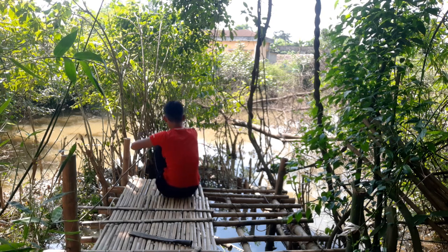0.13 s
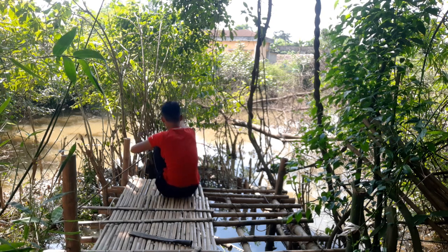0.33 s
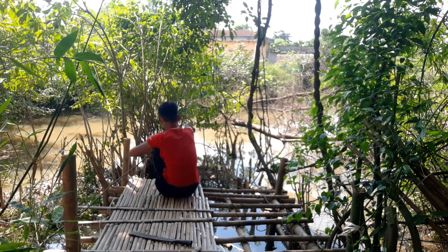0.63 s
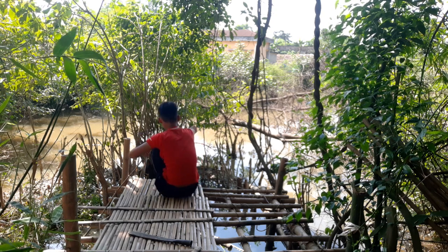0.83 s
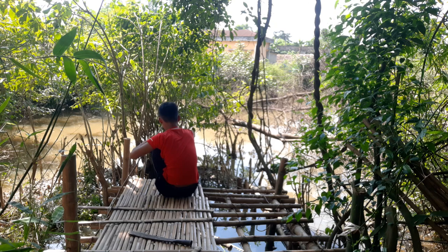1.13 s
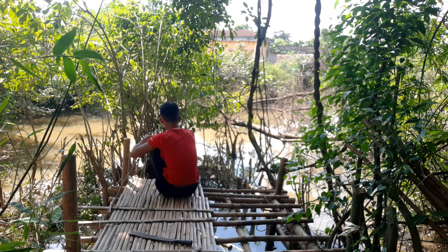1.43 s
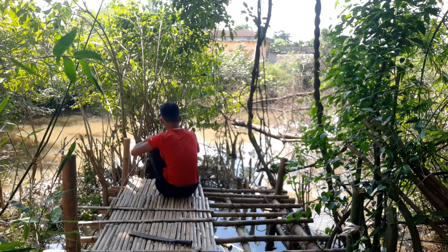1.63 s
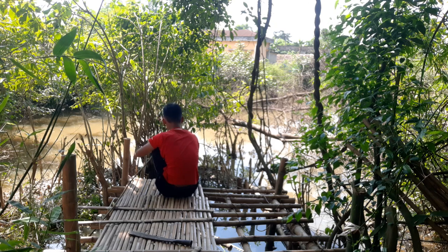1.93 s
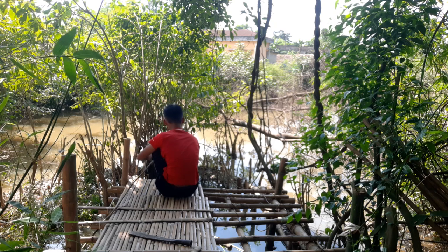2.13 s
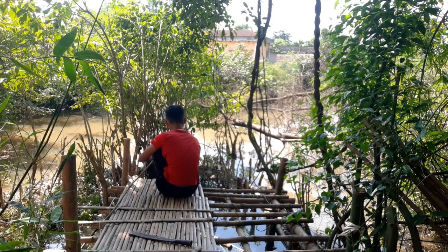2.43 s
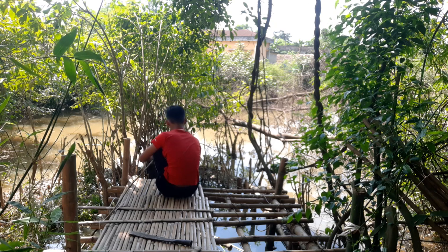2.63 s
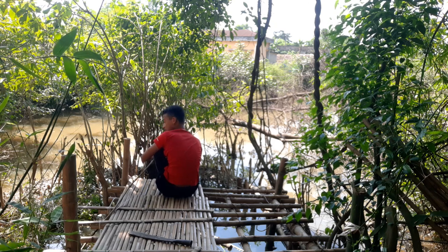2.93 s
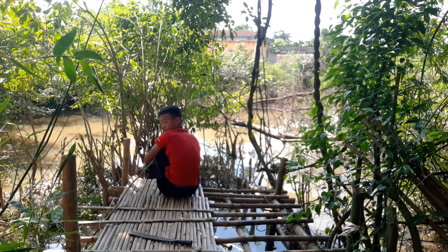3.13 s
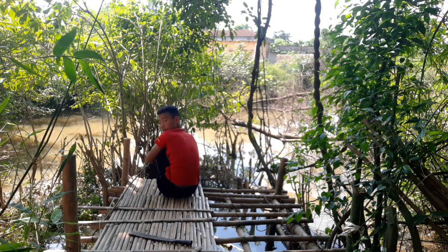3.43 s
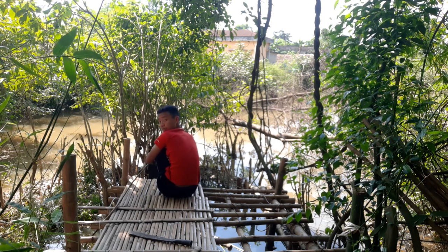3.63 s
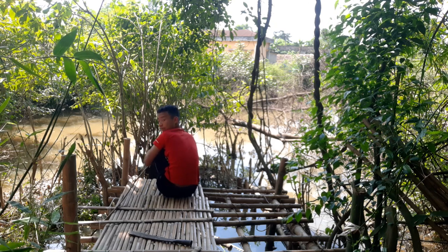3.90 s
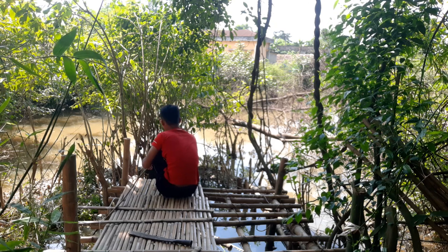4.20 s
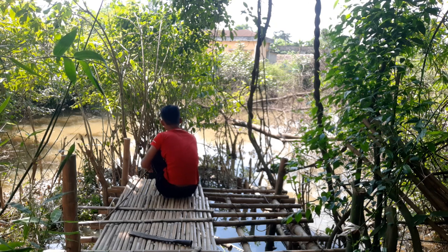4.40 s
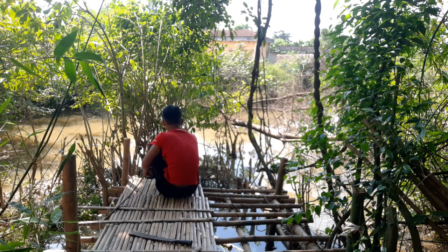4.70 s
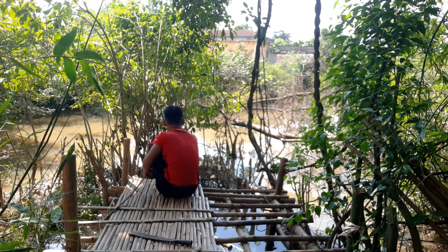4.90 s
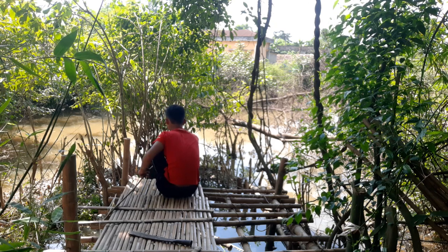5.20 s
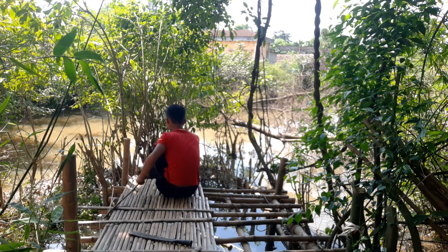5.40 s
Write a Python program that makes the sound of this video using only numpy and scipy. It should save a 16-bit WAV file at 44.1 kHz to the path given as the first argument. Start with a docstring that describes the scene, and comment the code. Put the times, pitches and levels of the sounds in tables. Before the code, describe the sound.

Cicadas dominate outdoors by a wooded pond: a narrow, shrill whine stronger on the right and a very high, throbbing sizzle on the left. Beneath lie dim engine rumble and a faint leafy wash. A few small bamboo ticks come early, then soft scrapes from around two seconds and again toward the end, as someone shifts on the deck. Wide stereo, with the deck fairly near.

```python
"""Cicadas first: a narrow whine, louder on the right, and a throbbing sizzle, louder on the left.
Whine: sums of click-rate partials through a body resonance. Sizzle: random clicks with echo ripples.
Under them two far engines (sine orders over noise rumble) and a wash of leaves and traffic (shaped noise).
Now and then a bamboo deck ticks and scrapes (noise bursts and grains into modes); faint far bird
notes (rough gliding sines) are heard as echo."""
import sys
import numpy as np
from scipy import signal
from scipy.fft import rfft, irfft
from scipy.io import wavfile
from scipy.ndimage import uniform_filter1d

SR = 44100
rng = np.random.default_rng(int(sys.argv[2]) if len(sys.argv) > 2 else 0)


def output_pcm(signal):
    """Save a mono or channel-first signal as 16-bit PCM at the path in sys.argv[1].

    Samples are clipped to [-1, 1] before scaling.
    """
    pcm = np.clip(np.atleast_2d(signal).T, -1, 1) * 32767
    wavfile.write(sys.argv[1], SR, np.round(pcm).astype(np.int16))


def decibels_to_gain(level_db):
    """Convert a level in decibels to a linear amplitude gain (20 dB per decade)."""
    exponent = np.asarray(level_db, float) / 20
    return 10 ** exponent


N = 244755
HZ = np.fft.rfftfreq(N, 1 / SR)
T = np.arange(N) / SR


def evened(x):
    """Scales each channel to rms 1."""
    return x / np.sqrt(np.mean(x ** 2, axis=-1, keepdims=True) + 1e-20)


def curves(rows):
    """Each column joined by straight lines in time."""
    s, *columns = np.transpose(rows)
    return [np.interp(T, s, c) for c in columns]


def read(points):
    """A spectrum joined by straight lines over log frequency."""
    f, value = np.transpose(points)
    return np.interp(np.log(HZ + 1), np.log(f + 1), value)


def coloured(x, gain):
    """Filters by a gain or a complex response at every frequency."""
    return irfft(rfft(x) * gain, N)


def sides(db):
    """Left and right gains for a left-minus-right difference."""
    return decibels_to_gain(np.array([db / 2, -db / 2]))


def wander(shape, per_s):
    """Smooth chance of about rms 1 that changes about per_s times a second."""
    step = 64  # samples
    slow = rng.standard_normal(shape + (N // step + 2,))
    count = slow.shape[-1]
    lowpass = np.exp(-(np.fft.rfftfreq(count, step / SR) / per_s) ** 2)
    slow = evened(irfft(rfft(slow) * lowpass, count))
    index = np.arange(N) // step
    part = np.arange(N) % step / step
    return slow[..., index] * (1 - part) + slow[..., index + 1] * part


def modes(table):
    """Causal response of a set of resonances."""
    return sum(decibels_to_gain(db) / (1 + 2j * (HZ - hz) / width_hz) for hz, width_hz, db in table)


def woods(x, t60):
    """Trunks and water scatter the sound into a diffuse tail, another one in each channel."""
    t = T[:round(t60 * SR)]
    tail = rng.standard_normal((2, len(t))) * decibels_to_gain(-60 * t / t60)
    return signal.fftconvolve(x, tail / np.linalg.norm(tail[0]), axes=1)[:, :N]


def faded(rows, level_db):
    """A gain that follows level_db within the table's span and is silent outside it."""
    start, end = rows[0][0], rows[-1][0]
    return decibels_to_gain(level_db) * np.interp(T, [start, start + 0.019, end - .03, end], [0, 1, 1, 0])


def arch(start, length, top, ends_db):
    """A gain that swells to 1 at the share top of its length, falls again, and is silent outside."""
    points_s = [start, start + top * length, start + length]
    return faded([(start,), (start + length,)], np.interp(T, points_s, [ends_db, 0, ends_db]))


# wash spectrum: f/Hz, relative level/dB per Hz
AIR_COLOUR = [(15, -52), (25, -72), (49, 0.5), (97, 0), (151, -29.5), (237, -13.5), (301, -36), (328, -14),
              (372, -17.5), (525, -23), (2460, -26.5), (2860, -26.5), (3320, -21.5), (3770, -41),
              (5200, -60), (8000, -44), (9000, -74)]
# left-right likeness: f/Hz, correlation
AIR_SAME = [(60, 1), (140, 0.58), (330, 0.2), (770, 0.56), (1800, 0), (8000, 0.75)]
# wash balance: f/Hz, left minus right/dB
AIR_SIDE = [(60, -8.5), (300, 2), (1200, 2), (2700, -4), (4200, -5), (5300, -10), (8500, -4)]
AIR_DB = -64.5


def air():
    """Far leaves and traffic: shaped noise whose left-right likeness varies with frequency."""
    left, other = rng.standard_normal((2, N)) * decibels_to_gain(0.5 * wander((1,), per_s=16))
    same = np.clip(read(AIR_SAME), -1, 1)
    right = coloured(left, same) + coloured(other, np.sqrt(1 - same ** 2))
    pair = coloured(np.array([left, right]), decibels_to_gain(read(AIR_COLOUR)) * sides(read(AIR_SIDE)))
    return decibels_to_gain(AIR_DB) * pair / pair.std()


# exhaust spectrum: f/Hz, relative level/dB
EXHAUST = [(21, -61), (35, -44), (54, -10.5), (96, -4), (141, -2.5), (174, -6.5), (222, -19.5), (313, -22),
           (500, -30.5), (650, -32.5), (1100, -120)]
# rumble of road and exhaust: t/s, level/dB
RUMBLE = [(0, -57.5), (.7, -62.5), (1.6, -69), (2.8, -59.5), (3.4, -63.5), (3.95, -55), (4.6, -59.5),
          (5.25, -61.5), (5.55, -52.5)]
# two far engines, one list each: t/s, firing rate/Hz, level before exhaust colour/dB
ENGINES = [
    [(0, 31.4, -64), (.7, 27.4, -75), (1.3, 31.6, -59), (2.2, 27.1, -66), (2.8, 24.5, -82),
     (3.3, 27.7, -71), (4.0, 25.9, -64), (4.6, 25.2, -59), (5.55, 30, -61)],
    [(2.2, 21, -75), (3.3, 20.4, -60), (3.9, 25, -66), (4.15, 22, -72), (4.4, 12.8, -85)],
]


def engine():
    """Firing orders of two engines over a noise rumble, dulled by distance."""
    colour = read(EXHAUST)
    out = decibels_to_gain(curves(RUMBLE)[0]) * evened(coloured(rng.standard_normal(N), decibels_to_gain(colour)))
    for rows in ENGINES:
        firing_hz, db = curves(rows)
        turns = np.cumsum(firing_hz) / SR
        fading_db = 2.45 * wander((10,), per_s=1.0)  # the air path swells each order on its own
        orders = 0
        for k in range(2, 12):
            gain = decibels_to_gain(np.interp(k * firing_hz, HZ, colour) + fading_db[k - 2])
            orders = orders + gain * np.sin(2 * np.pi * k * turns)
        out += faded(rows, db) * orders
    return out * sides(2.85)[:, None]


# far bird notes: start t/s, length/s, first f/Hz, last f/Hz, level before echo/dB
NOTES = [(1.6, .22, 2900, 2900, -77), (3.92, .12, 2500, 2200, -71), (4.33, .2, 3200, 2620, -67)]
SETTLE_S, NOTE_RISE_SHARE, NOTE_ENDS_DB = .06, .3, -10


def bird():
    """Faint rough whistles, level or sliding down to settle, heard only as echo."""
    out = np.zeros(N)
    for start, length, first_hz, last_hz, db in NOTES:
        hz = last_hz + (first_hz - last_hz) * np.exp(-np.maximum(T - start, 0) / SETTLE_S)
        rough = 1 + .042 * wander((), per_s=100)
        tone = np.sin(2 * np.pi * np.cumsum(hz * rough) / SR)
        out += decibels_to_gain(db) * arch(start, length, NOTE_RISE_SHARE, NOTE_ENDS_DB) * tone
    return woods(out * sides(-4)[:, None], t60=.12)


def lean():
    """Left and right colour of the deck, from points of f/Hz, left minus right/dB."""
    return sides(read([(500, 2.0), (1300, 0.5), (2500, -3), (4000, -14), (7000, 1), (9500, -10), (15000, 2)]))


DECK_LAG_SAMPLES = 6


def deck_pair(x):
    """The deck reaches the right microphone late."""
    return coloured(np.array([x, np.roll(x, DECK_LAG_SAMPLES)]), lean())


# bamboo modes, rung by scrape and ticks: f/Hz, width/Hz, relative level/dB
BAMBOO = [(380, 70, -5), (520, 35, 1), (680, 120, -7), (900, 60, -2), (1060, 80, -5), (1220, 50, 0),
          (1330, 60, 0), (1460, 40, 0), (1650, 150, -6), (2150, 250, -4), (2750, 300, -3), (3150, 300, 0),
          (3450, 300, -3), (4100, 500, -4), (6400, 1800, -6)]
# slides on the deck: start t/s, length/s, relative level at top/dB, high modes against low/dB
SLIDES = [(1.085, .22, -74.5, -2), (2.178, 0.47, -63, -15), (2.59, .47, -61, -5.5),
          (3.743, 0.15, -69.5, -5), (3.787, .5, -72.5, 7), (4.202, 0.58, -75, 6), (4.647, 0.83, -73, 3),
          (5.244, 0.41, -69, 9)]
# share of the length at which each group is loudest: low, middle, high modes
SLIDE_TOPS = (0.44, .58, 0.53)
SLIDE_SPLIT_HZ, SLIDE_MIDDLE_DB, SLIDE_ENDS_DB = (830, 1470), -1, -18


def scrape():
    """Uneven stick-slip grains ring low, middle and high modes, each group catching on its own."""
    grip = decibels_to_gain(2.34 * wander((3, 1), per_s=13.5))  # the slide catches and lets go
    grains = (rng.random((3, 2, N)) < 900 / SR) * rng.standard_normal((3, 2, N)) * grip
    low, below = (1 / (1 + (HZ / hz) ** 6) for hz in SLIDE_SPLIT_HZ)
    bands = (low, below - low, 1 - below)
    groups = [evened(coloured(g, modes(BAMBOO) * band)) for g, band in zip(grains, bands)]
    rung = np.zeros((2, N))
    for start, length, db, bright_db in SLIDES:
        for group, top, group_db in zip(groups, SLIDE_TOPS, (0, SLIDE_MIDDLE_DB, bright_db)):
            rung += decibels_to_gain(db + group_db) * arch(start, length, top, SLIDE_ENDS_DB) * group
    shared = 0.23 * deck_pair(rung[0])
    separate = 1.454 * rung[::-1] * sides(3.4)[:, None]
    return shared + separate


# bamboo ticks: t/s, relative level/dB, then bass, middle, treble against it/dB
TICKS = [(0.2089, -23.5, -11, -7, -26), (0.2745, -22.5, -8, -5, -30), (0.4324, -18.5, -10, -11.5, -10),
         (0.9844, -27, -3.5, -3.5, -30), (1.071, -26, -5.5, -3, -30), (1.155, -39.5, -7, 0, -16),
         (2.1396, -32, -1, -5.5, -24), (3.766, -40.5, -2, -10, -10), (3.8049, -45.5, -7, -5, -10),
         (3.878, -31, -13, -7, -2), (3.9104, -38.5, -9, -18, 1)]
SNAP_S, FIZZ_S, RATTLE_RISE_S, RATTLE_T60_S, FIZZ_HZ = 0.0012, .002, 0.0015, 0.16, 5200


def ticks():
    """A snap, a treble fizz and a rattling tail; snap and tail ring the poles, part of the tail per channel."""
    t, out = T[:SR // 4], np.zeros((2, N))
    decay = decibels_to_gain(-60 * t / RATTLE_T60_S)
    for s, db, bass_db, middle_db, treble_db in TICKS:
        at = round(s * SR)
        span = slice(at, at + len(t))
        snap, fizz, tails = np.zeros(N), np.zeros(N), np.zeros((3, N))
        snap[span] = rng.standard_normal(len(t)) * np.exp(-t / SNAP_S)
        fizz[span] = rng.standard_normal(len(t)) * (np.exp(-t / FIZZ_S) + 0.088 * decay)
        for tail, share in zip(tails, (.22, .12, .12)):  # shared, left, right
            tail[span] = share * rng.standard_normal(len(t)) * decay * (1 - np.exp(-t / RATTLE_RISE_S))
        blow_db = read([(250, bass_db - 7), (400, bass_db), (700, bass_db),
                        (1000, middle_db + 4.5), (1500, middle_db + 3), (2000, 0.0047)])
        ring = (modes(BAMBOO) + 0.64) * decibels_to_gain(blow_db) / (1 + 1j * HZ / 6000) ** 2
        sharp = coloured(snap, ring / (1 + 1800 / (1j * HZ + 1)) ** 2)  # too brief to move the low modes
        treble = decibels_to_gain(treble_db) / (1 + (FIZZ_HZ / (HZ + 1)) ** 4) / (1 + HZ / 9000)
        shared = sharp + coloured(tails[0], ring) + coloured(fizz, treble)
        out += decibels_to_gain(db) * (deck_pair(shared) + coloured(tails[1:], ring * lean()))
    return out


# sizzle spectrum before the ripple: f/Hz, relative level/dB per Hz
SIZZLE_COLOUR = [(4470, -54), (7600, -21), (8220, -14), (9170, -4.5), (9600, -4), (9740, -2), (10400, 4),
                 (11200, 0.5), (13600, -22), (14800, -13), (15700, -49)]
# spectral tilt before each channel is evened: f/Hz, left minus right/dB
SIZZLE_TILT = [(7600, -18.5), (9000, 3.5), (10500, 9.5), (12500, 4.5), (15800, 1)]
# fixed ripple that echoes leave in the sizzle: f/Hz, width/Hz, relative level/dB
SIZZLE_RIPPLE = [(8750, 40, -1), (9450, 32, 1), (9600, 32, -3), (10005, 38, -2), (10180, 38, -3),
                 (10545, 43, -3), (10993, 22, 1), (11095, 18, 0), (11170, 22, 1), (11343, 38, -3),
                 (11738, 22, -1), (11801, 18, -3), (11896, 32, -1), (12166, 54, -1)]
SIZZLE_DB, SIZZLE_SIDE_DB = -46, 14.5  # level, left minus right
THROB_HZ, THROB_DEPTH = 34.4, 0.55


def sizzle():
    """A dense hail of tymbal clicks, throbbing in strength, coloured by narrow echo ripples."""
    throb = 1 + THROB_DEPTH * np.sin(2 * np.pi * (THROB_HZ * T + rng.random()))
    clicks = (rng.random((2, N)) < 9000 / SR) * rng.standard_normal((2, N)) * throb
    ripple = 1 + 1.36 * abs(modes(SIZZLE_RIPPLE))
    colour = decibels_to_gain(read(SIZZLE_COLOUR)) * sides(read(SIZZLE_TILT)) * ripple * (HZ > 6000)
    phase = 40 * uniform_filter1d(rng.standard_normal((2, len(HZ))), 60)
    scatter = np.exp(1j * phase)  # leaves smear each click
    return decibels_to_gain(SIZZLE_DB) * sides(SIZZLE_SIDE_DB)[:, None] * evened(coloured(clicks, colour * scatter))


# whining chorus: t/s, level/dB
WHINE = [(0, -34.5), (1.1, -34.5), (2.2, -35.5), (3.5, -36.5), (3.68, -38.5), (3.9, -35.5), (4.6, -37),
         (5.55, -36)]
# click-rate partials, consecutive from 3: multiple, relative left level/dB, relative right level/dB
PARTIALS = [(3, -24, -19), (4, 12.5, -1.5), (5, 13.5, 1), (6, -74, -6.5), (7, -55, -6.5)]
# abdomen resonance: f/Hz, gain/dB
BODY = [(4000, -24.5), (4300, -7), (4500, -6), (4680, 4.5), (4860, 4), (5000, -10), (5150, -18.5),
        (5500, -20.5)]
# pitch droop of three singers: t of one droop/s, period/s, share of pitch
DROOP = (2.15, .63, .045)
SINGERS, CLICK_HZ = 14, 959  # singers per microphone, tymbal click rate
WHINE_SIDE_DB = -7.5  # left minus right


def whine():
    """Singers click near one rate, each straying on its own, so every partial is a narrow fuzzy band."""
    at, period, share = DROOP
    droop = (np.arange(SINGERS) < 3)[:, None] * share * np.cos(np.pi * (T - at) / period) ** 4
    rate_hz = CLICK_HZ * (1 + .028 * wander((2, SINGERS), per_s=70) - droop)
    cycles = np.cumsum(rate_hz, axis=-1) / SR + rng.random((2, SINGERS, 1))
    turn = np.exp(2j * np.pi * cycles).astype(np.complex64)
    partial, out = turn * turn, 0
    for _, left_db, right_db in PARTIALS:
        partial = partial * turn  # next multiple
        out = out + decibels_to_gain(np.array([[left_db], [right_db]])) * partial.real.sum(axis=1)
    out = coloured(out, decibels_to_gain(read(BODY)))
    chorus = evened(out + .5 * woods(out, t60=.3))
    return decibels_to_gain(curves(WHINE)[0]) * sides(WHINE_SIDE_DB)[:, None] * chorus


def scene():
    """All sources together."""
    return air() + engine() + bird() + scrape() + ticks() + sizzle() + whine()


def roll_off(x):
    """The treble ends steeply here."""
    return signal.sosfilt(signal.butter(12, 15820, fs=SR, output="sos"), x)


# gap in the left channel: f/Hz, gain/dB
LEFT_GAP = [(5100, 0), (5250, -30), (7100, -30), (7800, 0)]
EDGE_HZ = 15760


def record(dry):
    """Cuts a gap in the left treble and limits the band of both channels."""
    gains = np.array([decibels_to_gain(read(LEFT_GAP)), np.ones(len(HZ))])
    heard = coloured(dry, gains * (HZ < EDGE_HZ))
    return roll_off(heard)


dry = scene()
out = record(dry)
output_pcm(out)
```